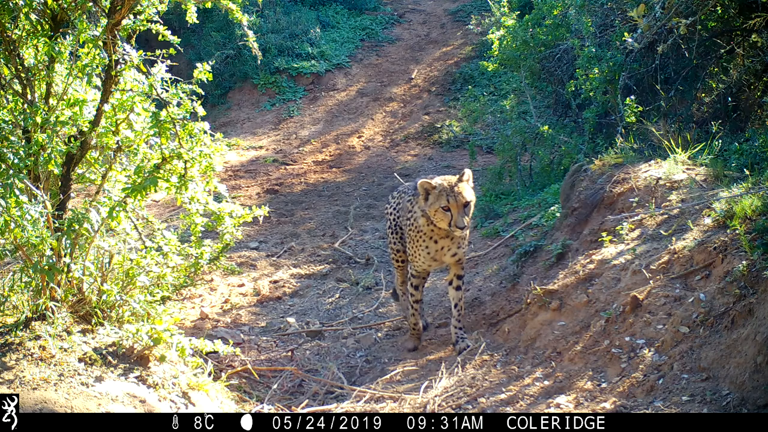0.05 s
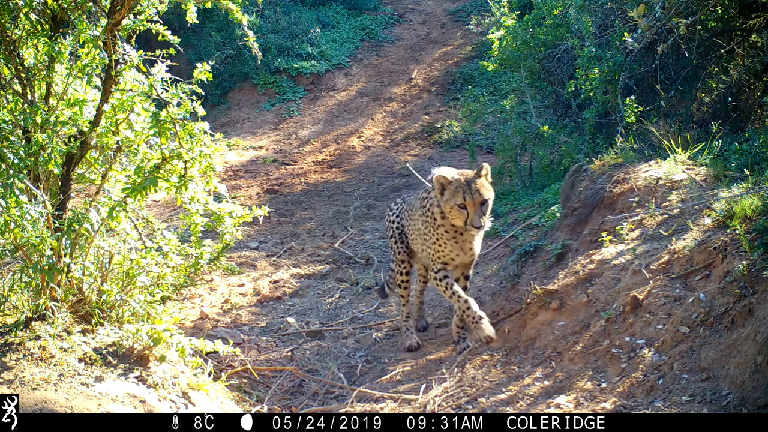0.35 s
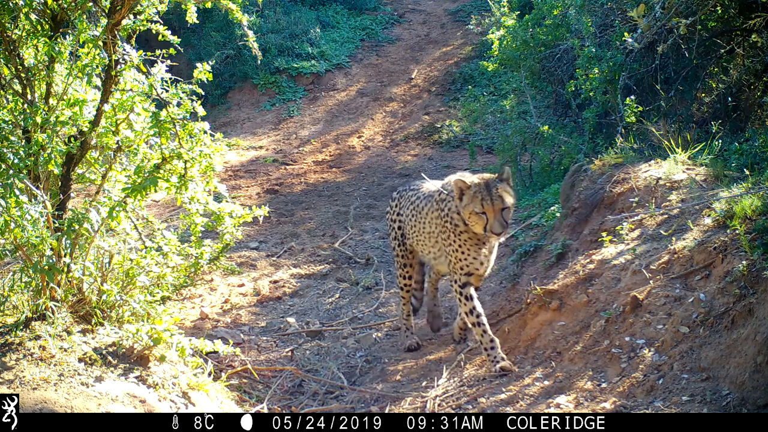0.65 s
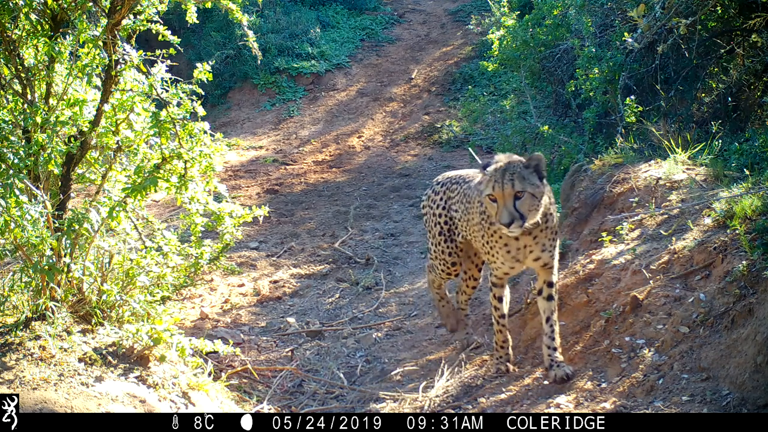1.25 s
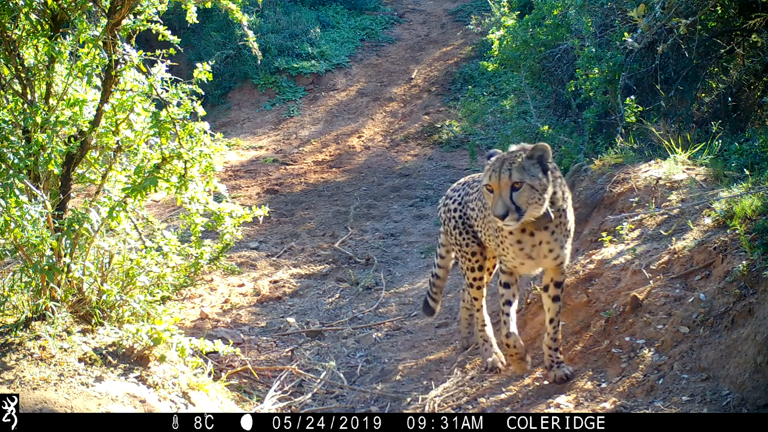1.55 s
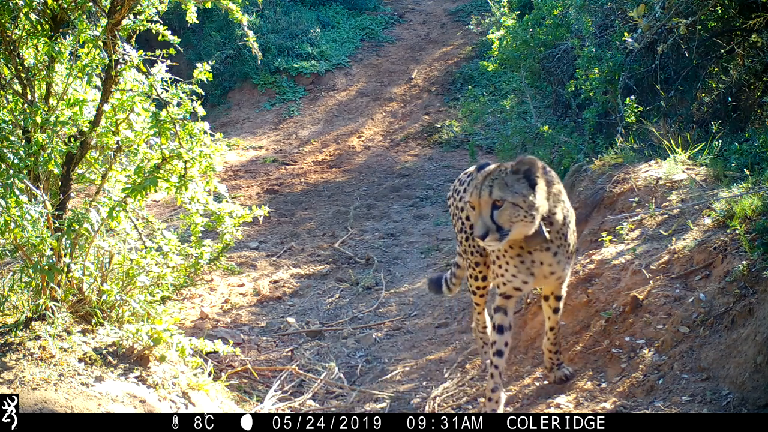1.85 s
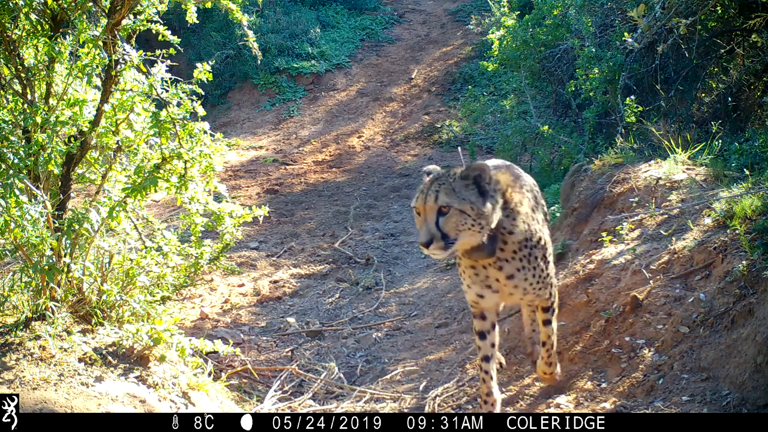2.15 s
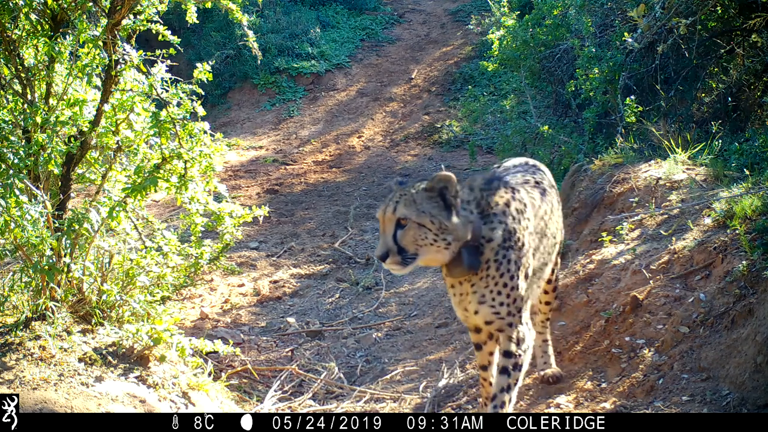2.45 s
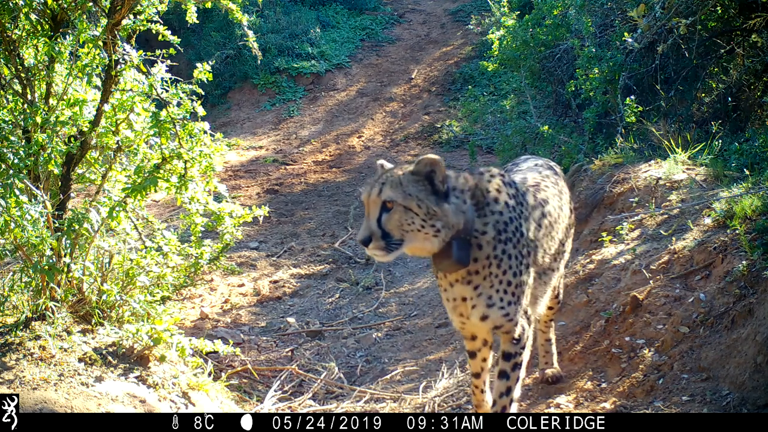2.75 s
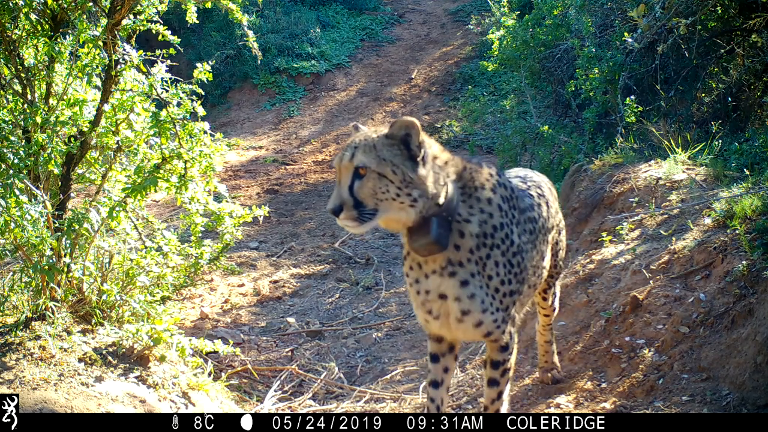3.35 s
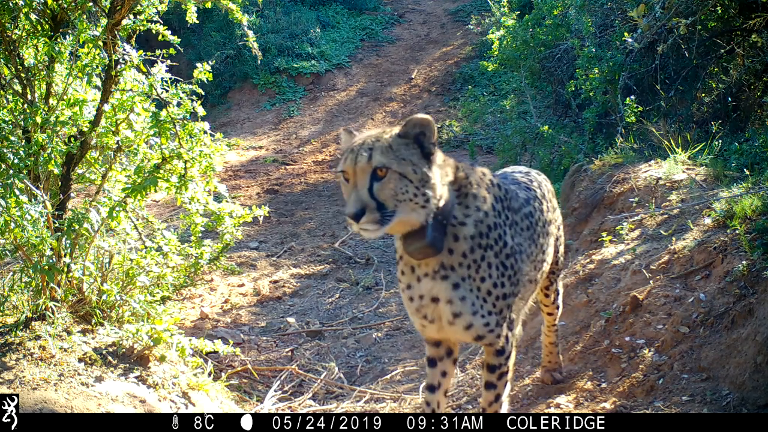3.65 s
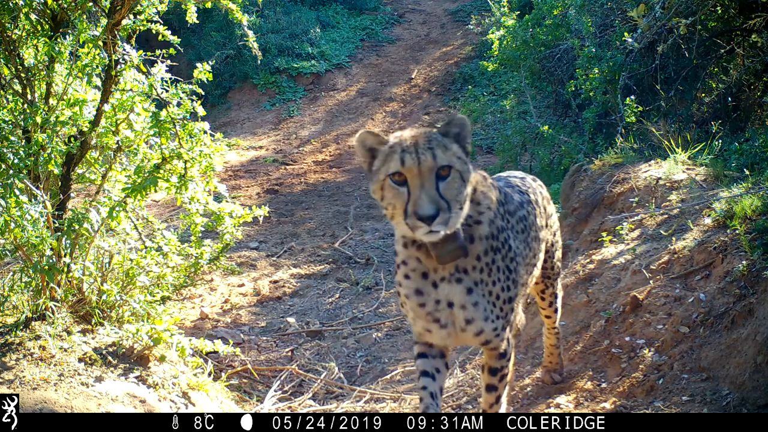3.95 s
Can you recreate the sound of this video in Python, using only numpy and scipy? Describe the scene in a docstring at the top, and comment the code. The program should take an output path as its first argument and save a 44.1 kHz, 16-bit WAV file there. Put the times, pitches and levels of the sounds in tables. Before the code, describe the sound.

Birds chirp, whistle and rasp over faint hiss and a big cat's light crunching steps.

```python
"""A trail camera switches on; its own hiss and faint ticking buzz run under all that follows.
Small birds chirp and whistle in dry bush, each note a frequency-modulated pure tone.
A big cat walks up a dirt track: its paws crunch grit in swells of tiny impacts and snap dry stalks.
Near 2.8 s one bird gives a loud, rasping call, both sides of its syrinx sounding at once.
The longest crunches follow near 3.5 s. The shrubs scatter each sound into a short tail."""
import sys
import numpy as np
from scipy import signal
from scipy.fft import rfft, irfft, next_fast_len
from scipy.io import wavfile
from scipy.ndimage import map_coordinates

SR = 44100
rng = np.random.default_rng(int(sys.argv[2]) if len(sys.argv) > 2 else 0)


def persist_wave(psi):
    """Save psi, clipped to +-1, as 16-bit WAV."""
    counts = np.round(np.clip(psi, -1, 1) * 32767).astype(np.int16)
    wavfile.write(sys.argv[1], SR, np.atleast_2d(counts).T)


N = 176400
T = np.arange(N) / SR


def amp(db):
    """Amplitude ratio of a level in decibels."""
    return 10 ** (np.asarray(db) / 20)


def unit_rms(x):
    """Normalisation to unit mean power."""
    return x / np.sqrt(np.mean(x ** 2) + 1e-20)


def gain(spectrum, hz):
    """Magnitude response, interpolated in level over log frequency."""
    f, db = np.transpose(spectrum)
    return amp(np.interp(np.log(hz + 1), np.log(f + 1), db))


def filtered(x, response):
    """Zero-phase filtering: the spectrum of x times a response of frequency."""
    size = next_fast_len(len(x) + 4096)
    return irfft(rfft(x, size) * response(np.fft.rfftfreq(size, 1 / SR)), size)[:len(x)]


def wobble(knots_per_s, size):
    """Low-pass random modulation: a spline through Gaussian values."""
    return map_coordinates(rng.standard_normal(4000), [np.arange(size) * knots_per_s / SR], mode="wrap")


def add(out, start, x):
    """Superposition of x on out from a start time in seconds."""
    i = max(0, round(start * SR))
    out[i:i + len(x)] += x[:max(0, N - i)]


# Spectral density of the hiss: f/Hz, relative level/dB
HISS_SPECTRUM = [(20, -36), (50, -27), (100, -18.5), (200, -18), (400, -15), (700, -8), (1000, -4),
                 (1500, -1), (2200, 0.5), (3000, 0.5), (4200, -4.5), (5500, -9), (7000, -14), (9000, -21),
                 (10500, -28), (12000, -46.5)]
# Spectrum of one tick: f/Hz, relative level/dB
TICK_SPECTRUM = [(20, -32), (60, -18), (120, -13.5), (240, -9), (420, -5.5), (620, -0.5), (800, -3.5),
                 (980, -8.5), (1200, -2), (1450, 2), (1750, -2.5), (2200, -2.5), (3000, -10.5),
                 (4500, -21.5), (8000, -48)]


def electronics(hiss_db=-49, buzz_db=-58, frame_hz=60.018, first_tick_s=0.0061):
    """Broadband noise plus a periodic pulse train, one electrical tick per picture frame."""
    hiss = unit_rms(filtered(rng.standard_normal(N), lambda hz: gain(HISS_SPECTRUM, hz)))
    size = 4096
    cepstrum = irfft(np.log(gain(TICK_SPECTRUM, np.fft.rfftfreq(size, 1 / SR))))
    folded = np.r_[cepstrum[0], 2 * cepstrum[1:size // 2]]  # minimum phase: an abrupt onset
    tick = irfft(np.exp(rfft(folded, size)))
    tick_times = np.arange(first_tick_s, N / SR, 1 / frame_hz)
    pulses = np.bincount(np.round(tick_times * SR).astype(int), minlength=N)
    buzz = unit_rms(signal.fftconvolve(pulses, tick)[:N])
    return amp(hiss_db) * hiss + amp(buzz_db) * buzz


def shrub_scatter(x, t60_s=0.42):
    """Diffuse scattering by the shrubs: convolution with exponentially decaying noise."""
    t = np.arange(SR // 2) / SR
    tail = rng.standard_normal(len(t)) * amp(-60 * t / t60_s)
    return signal.fftconvolve(x, tail / np.linalg.norm(tail))[:N]


def note(hz, db, release_share, attack_share=0.23, flutter=0.27):
    """A tone whose phase is the integral of frequency; it swells, flutters and fades."""
    u = np.linspace(0, 1, len(hz))
    ramps = np.clip(np.minimum(u / attack_share, (1 - u) / release_share), 0, 1)
    envelope = np.sin(np.pi / 2 * ramps) * (1 + flutter * wobble(220, len(u)))
    return np.sqrt(2) * amp(db) * envelope * np.sin(2 * np.pi * np.cumsum(hz) / SR)


# Quick chirps: t/s, duration/s, start f/Hz, middle f/Hz, end f/Hz, level/dB
CHIRPS = [(.112, .014, 4580, 4480, 4000, -42.5), (.123, 0.01, 4100, 3470, 2750, -37.5),
          (0.135, 0.03, 2570, 3005, 2360, -31.5), (0.178, 0.071, 2423, 2697, 2725, -35),
          (.243, 0.053, 2733, 2680, 2680, -49), (.499, 0.014, 3450, 3100, 2770, -42),
          (0.528, .015, 3600, 2980, 2660, -46.5), (0.551, 0.015, 3000, 3280, 3700, -41.5),
          (0.569, .018, 3850, 4130, 4300, -48), (0.602, .012, 3500, 3150, 3030, -47),
          (0.612, 0.015, 2930, 3380, 3830, -45.5), (0.69, 0.02, 2670, 2380, 2150, -52),
          (0.729, 0.029, 3060, 3330, 3500, -40.5), (0.809, .025, 2410, 3000, 3500, -40.5),
          (0.851, 0.019, 2870, 2810, 2370, -42.5), (.885, 0.019, 2410, 2780, 2830, -45),
          (0.944, 0.033, 2740, 3200, 3650, -40.5), (0.968, 0.0086, 3470, 3980, 4560, -47),
          (1.022, 0.029, 3650, 2800, 2280, -46), (1.054, 0.025, 2150, 2167, 2250, -46.5),
          (1.07, .071, 2290, 2693, 2490, -48.5), (2.89, .016, 3880, 3380, 3630, -30.5),
          (2.936, 0.0121, 3560, 3320, 3120, -29), (2.959, 0.017, 3170, 3500, 3800, -32)]
# Soft, far whistles: t/s, duration/s, start f/Hz, middle f/Hz, end f/Hz, level/dB
FAR_WHISTLES = [(.612, 0.15, 3100, 2717, 3090, -53.5), (0.859, 0.089, 3000, 2990, 3190, -48),
                (1.89, 0.16, 3130, 2790, 3070, -55), (2.162, .095, 2936, 3135, 3200, -52.5),
                (3.156, 0.081, 3440, 3456, 3540, -48.5), (3.977, 0.045, 3120, 3100, 3200, -56)]
# Whistles that hold, then sweep up: t/s, duration/s, start f/Hz, end f/Hz, held level/dB
UPSLURS = [(0.158, .14, 3250, 4860, -49.5), (1.1, 0.11, 3270, 4310, -47.5), (2.383, 0.2, 3163, 4610, -50),
           (3.327, 0.086, 3470, 3640, -49)]


def songbirds(release_share=0.16, far_release_share=0.22, slur_fade_db=4):
    """Frequency modulation: notes follow a parabola through three pitches, or hold and rise."""
    out = np.zeros(N)
    for notes, release in (CHIRPS, release_share), (FAR_WHISTLES, far_release_share):
        for start, duration, first, middle, last, db in notes:
            u = np.linspace(0, 1, int(duration * SR))
            parabola = np.polyfit([0, 0.5, 1], [first, middle, last], 2)
            add(out, start, note(np.polyval(parabola, u), db, release))
    for start, duration, first, last, db in UPSLURS:
        u = np.linspace(0, 1, int(duration * SR))
        sweep = np.sin(np.pi / 2 * u ** 3.1)  # the exponent delays the rise
        add(out, start, note(first + (last - first) * sweep, db - slur_fade_db * sweep, release_share))
    return out


def level_curve(times, db):
    """Amplitude envelope, piecewise linear in decibels and silent outside its span."""
    return amp(np.interp(T, times, db, left=-150, right=-150))


# The two voices of the call: t/s, f/Hz, level/dB, roughness (noise share of the power, 0-1)
UPPER_VOICE = [(2.772, 3050, -56, .02), (2.777, 3172, -37, 0.05), (2.785, 3250, -37, 0.07),
               (2.793, 3650, -34, 0.06), (2.80, 3870, -39.5, 0.04), (2.83, 3930, -33, 0.08),
               (2.839, 3990, -38, 0.23), (2.872, 4030, -36, 0.06), (2.89, 4030, -47.5, 0.4),
               (2.917, 4060, -41, .4), (2.928, 4000, -45, 0.5), (2.97, 3990, -49, 0.3),
               (2.979, 4000, -43.5, 0), (3.004, 4120, -44, 0.04), (3.019, 4060, -45, 0.8),
               (3.039, 4060, -36.5, 0.2), (3.051, 4080, -49, .3), (3.09, 4200, -47, .4),
               (3.16, 4080, -56, 0.2)]
LOWER_VOICE = [(2.795, 3260, -48, .8), (2.83, 3260, -48, .8), (2.885, 3310, -59, .8),
               (2.911, 3400, -38, .4), (2.928, 3450, -51, 0.55), (2.936, 3400, -49, .4),
               (2.954, 3172, -37, .25), (2.985, 3250, -49, 0.8), (3.001, 3153, -42, 0.77),
               (3.055, 3193, -44.5, 0.66), (3.1, 3257, -43, .6), (3.138, 3310, -56, .7)]
# Envelope of the noise between the voices: t/s, level/dB
RASP_ENVELOPE = [(2.79, -58), (2.88, -41.5), (2.95, -46), (2.985, -34), (3.04, -40), (3.11, -43.5),
                 (3.15, -58)]
# Spectrum of that noise: f/Hz, relative level/dB
RASP_SPECTRUM = [(2500, -44), (2950, -8), (3200, -5.5), (3650, 0.5), (4100, -0.5), (4300, -13), (4800, -41)]


def rasping_bird(pulse_hz=128.6, pulse_depth=0.45, roughness_hz=241):
    """Biphonation: both sides of the syrinx sound at once, pulsing and breaking up into noise."""
    noise = unit_rms(filtered(rng.standard_normal(N), lambda hz: gain(RASP_SPECTRUM, hz)))
    out = level_curve(*np.transpose(RASP_ENVELOPE)) * noise
    pulse_rate = pulse_hz * (1 + 0.1 * wobble(60, N))
    pulsing = np.sin(2 * np.pi * np.cumsum(pulse_rate) / SR)
    for voice in UPPER_VOICE, LOWER_VOICE:
        times, hz, db, roughness = np.transpose(voice)
        roughness = np.clip(np.interp(T, times, roughness), 0, 1)
        random_phasor = (wobble(roughness_hz, N) + 1j * wobble(roughness_hz, N)) / np.sqrt(2)
        broadening = np.sqrt(1 - roughness) + np.sqrt(roughness) * random_phasor
        modulation = 1 + pulse_depth * np.minimum(1, roughness / 0.13) * pulsing
        carrier = np.exp(2j * np.pi * np.cumsum(np.interp(T, times, hz)) / SR)
        out += np.sqrt(2) * level_curve(times, db) * (broadening * modulation * carrier).real
    return out


# Broad body spectrum of dry ground and wood: f/Hz, relative level/dB
GROUND_SPECTRUM = [(30, -36), (400, -25), (1000, -3), (1700, 7.5), (3000, 7.5), (6000, 4), (11000, 0)]
# Paw crunches: peak t/s, rise/s, fall/s, level/dB, centre f/Hz, relative body level/dB
CRUNCHES = [(.347, .004, 0.0097, -45, 4630, -8), (.426, .003, .013, -44, 5300, -2),
            (0.435, .002, 0.0045, -44, 7500, -15), (0.907, 0.0044, .012, -47.5, 6800, -17),
            (.94, .02, .04, -54.5, 5460, -9), (1.557, 0.0033, .010, -48, 5500, -10),
            (1.564, 0.0016, 0.0042, -37.5, 7200, -9), (1.598, 0.0016, 0.01, -36, 3460, -10),
            (1.622, 0.017, 0.013, -37, 2900, -11), (1.91, 0.027, 0.044, -51, 3800, -9),
            (2.17, .03, 0.04, -63, 4000, -15), (2.478, 0.0096, 0.012, -38.5, 4460, -7),
            (2.502, 0.0077, 0.016, -40, 4660, -14), (3.095, 0.02, 0.03, -47, 4440, -12),
            (3.122, 0.0054, 0.01, -38.5, 4900, 13), (3.40, 0.013, 0.018, -44, 4660, -9),
            (3.458, 0.032, 0.039, -39, 4260, -9), (3.549, 0.014, 0.021, -46.5, 4400, -11),
            (3.577, 0.009, 0.01, -40.5, 4500, -8), (3.621, 0.037, 0.03, -38.5, 4400, -8),
            (3.667, 0.037, 0.077, -39.5, 4360, -6), (3.769, 0.012, 0.0074, -46, 6000, -4),
            (3.87, 0.035, .04, -57, 4800, -12)]


def paw_crunches(grains_per_s=6500, grain_spread_db=4, width_octaves=0.36):
    """Shot noise: each crunch is a swell of random grit clicks around its own centre frequency."""
    out = np.zeros(N)
    t = np.arange(-SR // 6, SR // 3) / SR
    for peak_time, rise, fall, db, centre, body_db in CRUNCHES:
        sizes = amp(grain_spread_db * np.minimum(rng.exponential(size=len(t)), 4))
        impacts = rng.random(len(t)) < grains_per_s / SR
        grains = impacts * rng.choice([-1, 1], len(t)) * sizes
        band = lambda hz: np.exp(-0.5 * (np.log2((hz + 1) / centre) / width_octaves) ** 2)
        grit = filtered(grains, lambda hz: band(hz) + amp(body_db) * gain(GROUND_SPECTRUM, hz))
        swell = np.exp(-np.where(t < 0, -t / rise, t / fall) ** 1.18)
        add(out, peak_time + t[0], amp(db) * swell * unit_rms(grit))
    return out


# Snapping stalks: t/s, envelope peak level/dB, ringing f/Hz
SNAPS = [(0.4253, -34, 3970), (0.426, -36.5, 7070), (0.9033, -39, 6600), (.947, -36, 3400),
         (1.5978, -27, 3200), (1.6055, -28, 3500), (2.1252, -35.5, 3700), (2.151, -36.5, 3650),
         (2.4762, -31, 4800), (2.4779, -32, 4430), (2.756, -34, 4440), (2.758, -34, 3700),
         (3.516, -29, 3570), (3.589, -37, 6450), (3.6163, -23, 4260), (3.6198, -33, 4000),
         (3.661, -37, 5200)]


def stalk_snaps(rise_s=0.00035, t60_s=0.0038, crack=0.5, cutoff_hz=1200):
    """Damped free vibration: a dry stalk cracks and rings briefly, too thin to radiate bass."""
    out = np.zeros(N)
    t = np.arange(SR // 40) / SR
    envelope = (1 - np.exp(-t / rise_s)) * amp(-60 * t / t60_s)
    for start, db, hz in SNAPS:
        snap = np.sin(2 * np.pi * hz * t) + crack * rng.standard_normal(len(t))
        add(out, start, amp(db) * snap * envelope / envelope.max())
    return filtered(out, lambda hz: hz ** 4 / (hz ** 4 + cutoff_hz ** 4))


def scene(scatter_db=-10):
    """Superposition of the direct sound of birds and footfalls with its scattered field."""
    direct = songbirds() + rasping_bird() + paw_crunches() + stalk_snaps()
    return (direct + amp(scatter_db) * shrub_scatter(direct))[None]


# Frequency response of the dull little microphone: f/Hz, relative level/dB
MIC_RESPONSE = [(20, 2.5), (7000, -0.5), (9000, -9), (10500, -17), (12000, -32)]


def record(dry, switch_on_s=0.072, bandwidth_hz=12200):
    """Band-limited transduction with additive self-noise, switched on just after the start."""
    heard = filtered(dry[0], lambda hz: gain(MIC_RESPONSE, hz)) + electronics()
    return filtered(heard * (T >= switch_on_s), lambda hz: hz < bandwidth_hz)[None]


dry = scene()
out = record(dry)
persist_wave(out)
```